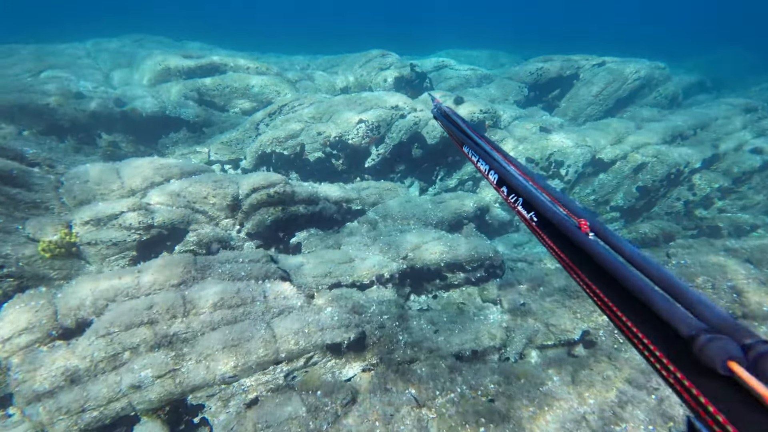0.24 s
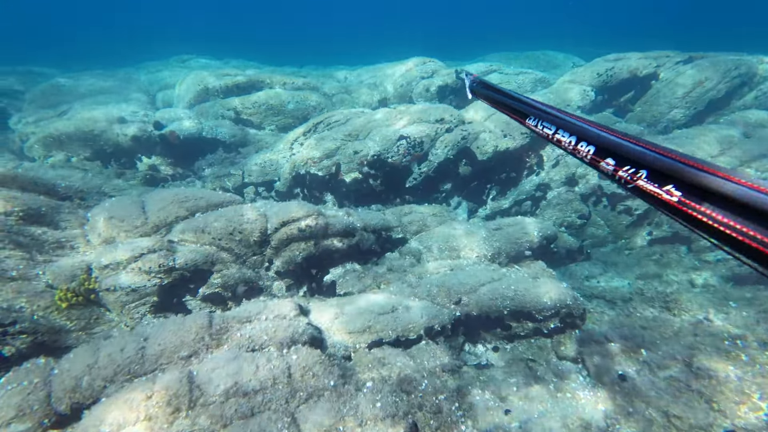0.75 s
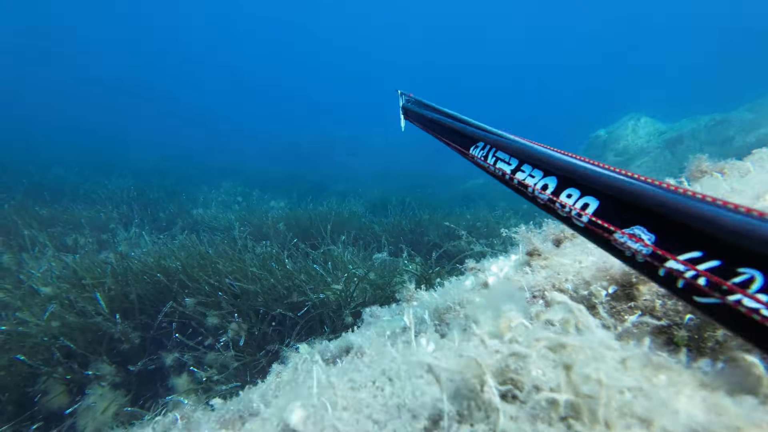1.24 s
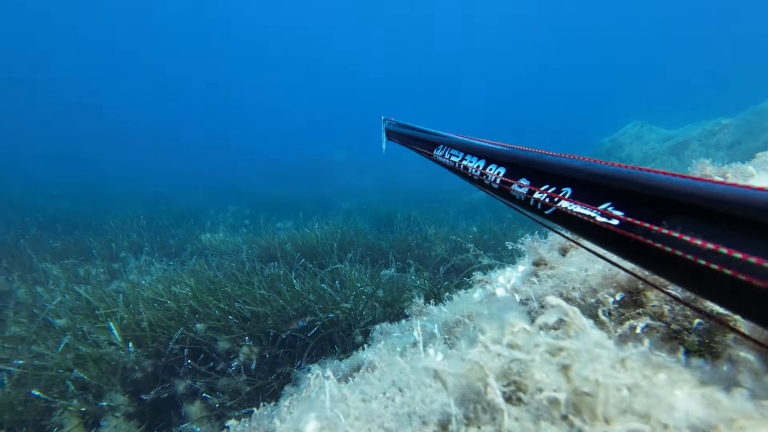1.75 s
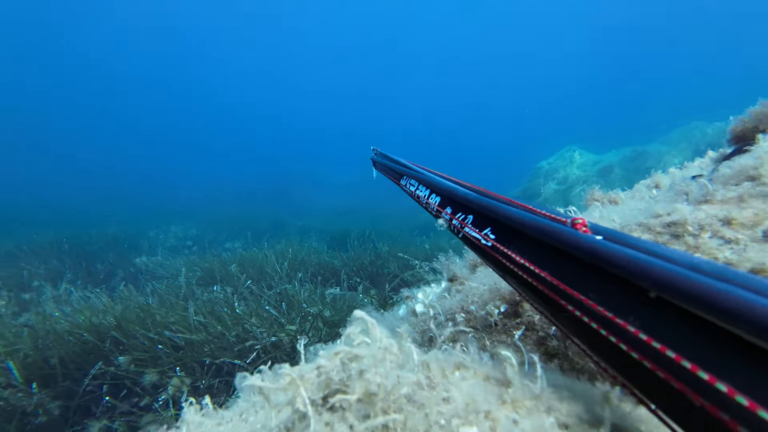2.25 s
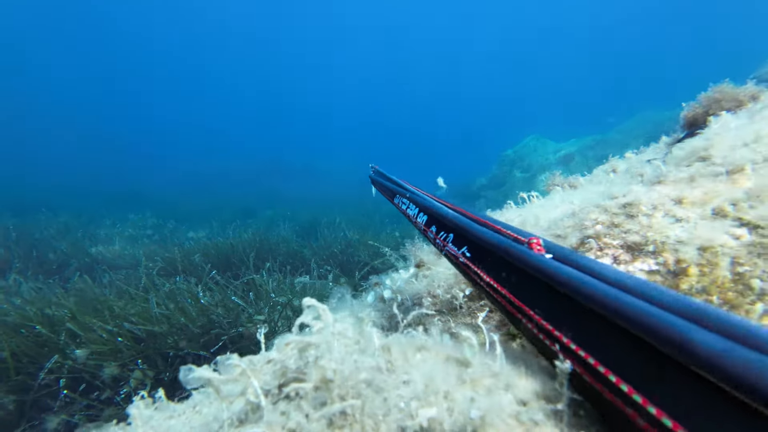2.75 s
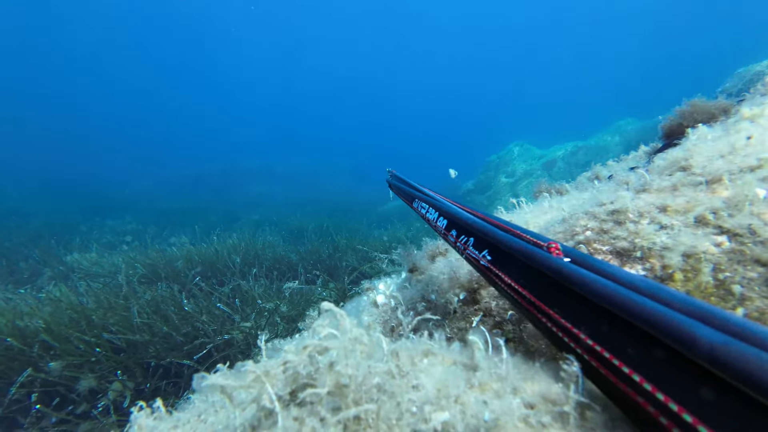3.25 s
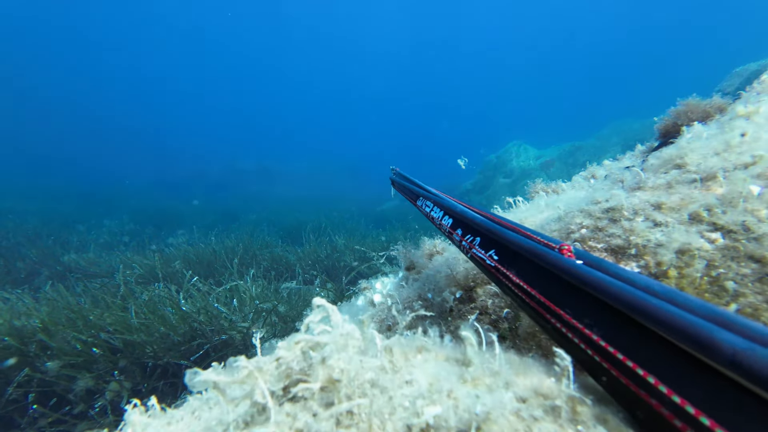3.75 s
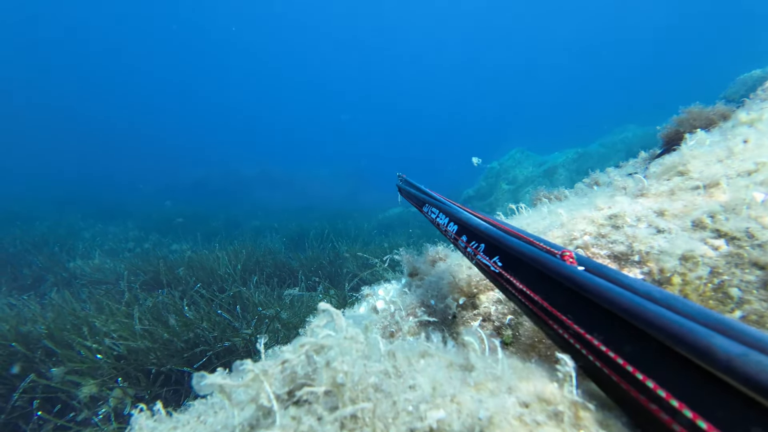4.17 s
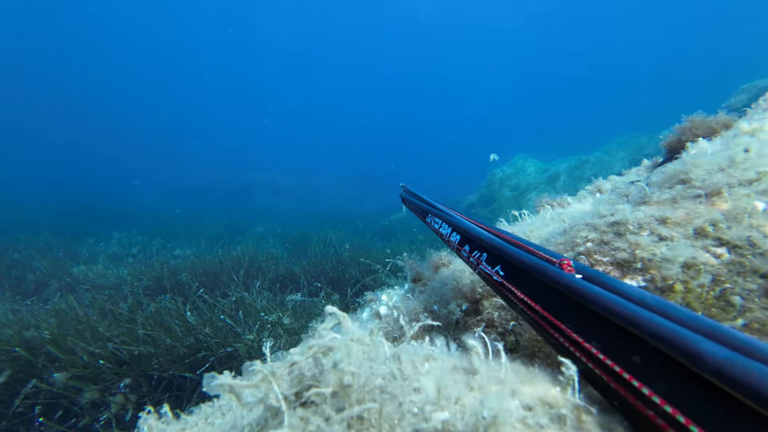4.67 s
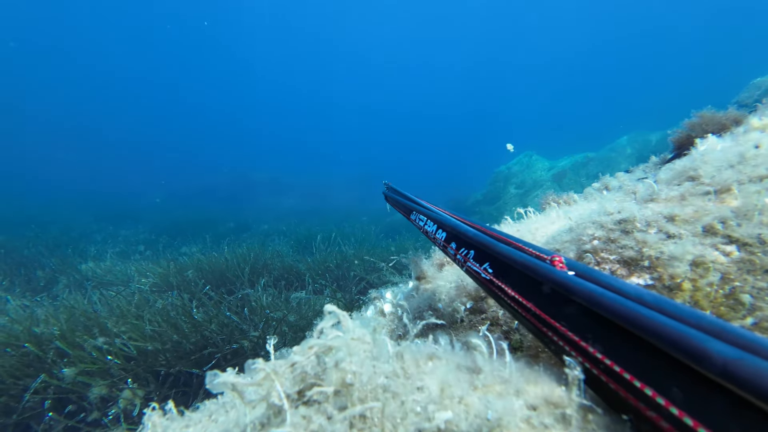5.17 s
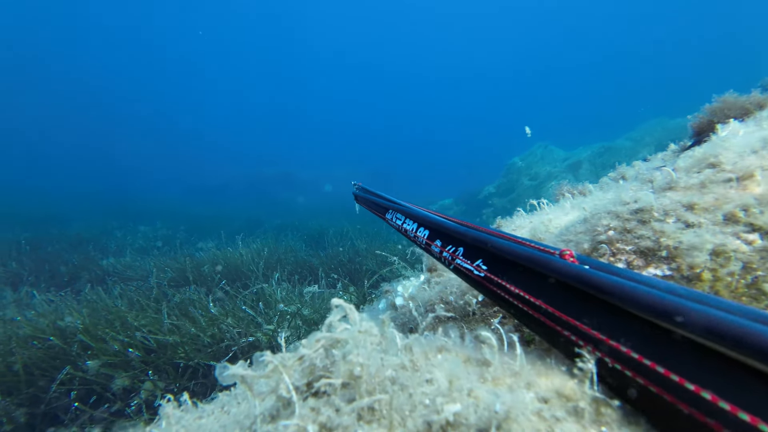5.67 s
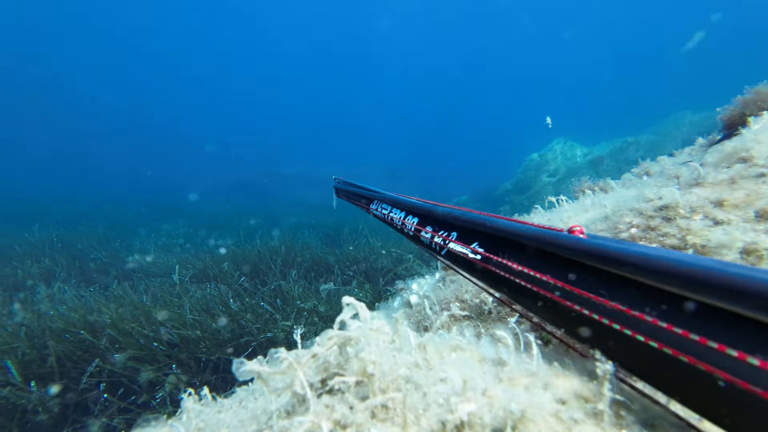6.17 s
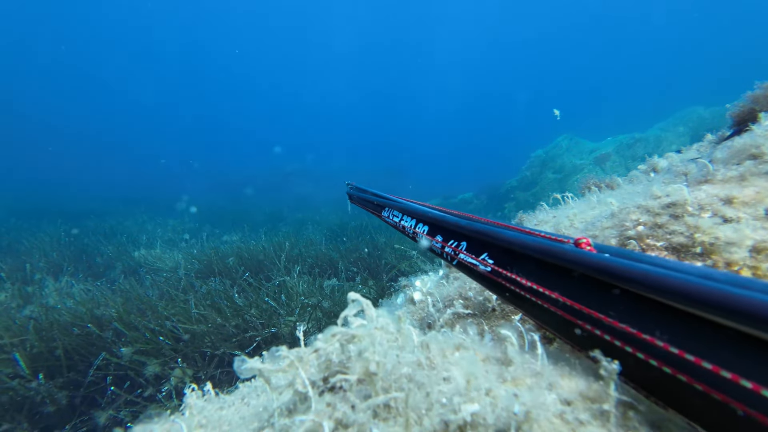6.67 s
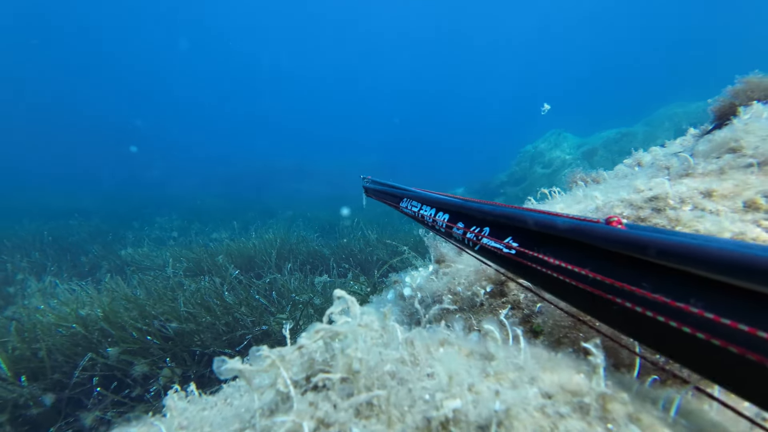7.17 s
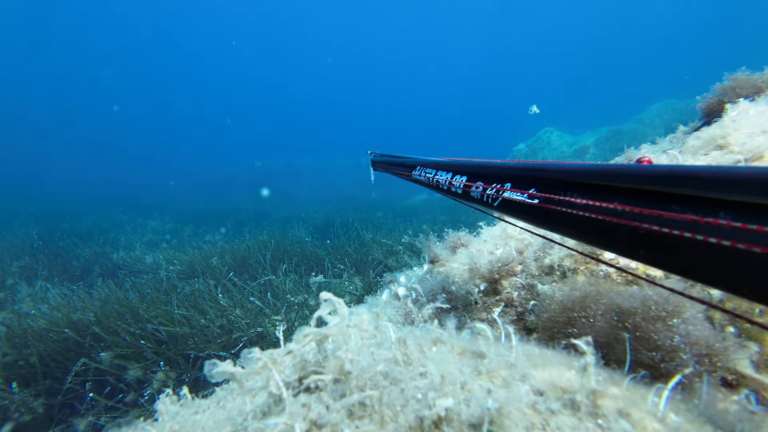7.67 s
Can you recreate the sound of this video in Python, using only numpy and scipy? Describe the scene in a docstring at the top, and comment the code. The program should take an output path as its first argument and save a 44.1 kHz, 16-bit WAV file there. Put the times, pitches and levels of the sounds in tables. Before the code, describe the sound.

Underwater by a rocky seabed, heard close and muffled inside a waterproof camera housing. Snapping shrimp make a continuous dense crackle, with individual sharp snaps ringing very briefly and scattering off rocks, above low water rumble, faint hum and hiss. Clear snaps dot the first half second; soft low bumps fall at the start and 0.8. Around 1.1 to 1.3 come more bumps and an abrupt change: snaps ring higher, rumble weakens, water swishes. A deep, strong thump with a hard knock and scrape lands at 2.4, then a swish and a cluster of bumps and taps at 2.7 to 2.8. Bright snaps stand out near 3.2 and 4.65. Light clacks at 3.7 lead to quick knocks at 4.2 to 4.4. Gear clatters and scrapes again at 5.4 to 5.6, with soft bumps at 6.2 and 7.6, as the crackle slowly ebbs to 8 seconds.

```python
"""Snapping shrimp crackle all around over a low water rumble, as heard from a camera in a waterproof housing.
A diver with a speargun lies on a rocky seabed; each clear snap rings the housing wall and scatters off the rocks.
The diver's gear bumps, scrapes and taps as filtered noise, slow sines and short rings, and water swishes past.
After a moment the place changes: the snaps ring higher, the rumble drops and the crackle slowly ebbs."""
import sys
import numpy as np
from scipy import signal
from scipy.fft import rfft, irfft, next_fast_len
from scipy.io import wavfile
from scipy.ndimage import map_coordinates

SR = 44100
rng = np.random.default_rng(int(sys.argv[2]) if len(sys.argv) > 2 else 0)


def wrap_up_sound(samples):
    """Save the sound to the file named by the first command line argument, as 16-bit audio."""
    columns = np.atleast_2d(samples).T
    # keep every value between -1 and 1, then stretch to whole-number steps
    tamed = np.clip(columns, -1, 1)
    steps = np.round(tamed * 32767).astype(np.int16)
    wavfile.write(sys.argv[1], SR, steps)


N = 348831  # length in samples
MOVE_S = 1.28  # the change of place


def amp(db):
    """Decibels to gain."""
    return 10 ** (np.asarray(db) / 20)


def unit(x):
    """x at rms 1."""
    return x / np.sqrt(np.mean(x ** 2) + 1e-20)


def gains(points, hz):
    """Gain of a (Hz, dB) spectrum, read on a log axis."""
    f, db = np.transpose(points)
    return amp(np.interp(np.log(hz + 1), np.log(f + 1), db))


def wobble(rate):
    """A smooth random curve, rate knots a second."""
    knots = rng.standard_normal(int(N * rate / SR) + 4)
    return map_coordinates(knots, [np.arange(N) * rate / SR])


def filtered(x, response):
    """x times a response of frequency."""
    m = next_fast_len(N + SR // 2)
    spectrum = rfft(x, m) * response(np.fft.rfftfreq(m, 1 / SR))
    return irfft(spectrum, m)[:N]


def noise(spectrum):
    """Coloured noise of rms 1."""
    return unit(filtered(rng.standard_normal(N), lambda hz: gains(spectrum, hz)))


def ring(spectrum, shift=1, size=2048):
    """Causal (minimum-phase) answer, of peak 1, of a body with this spectrum to one sharp push."""
    hz = np.fft.rfftfreq(size, 1 / SR) / shift
    cepstrum = irfft(np.log(gains(spectrum, hz)))
    # folding the cepstrum forward in time makes the answer causal
    cepstrum[1:size // 2] *= 2
    cepstrum[size // 2 + 1:] = 0
    answer = irfft(np.exp(rfft(cepstrum)))
    return answer / np.abs(answer).max()


def through(x, answer):
    """x convolved with an answer, at its own length."""
    return signal.fftconvolve(x, answer)[:len(x)]


def add(track, s, sound):
    """Mix a sound into the track from time s."""
    start = int(np.clip(round(s * SR), 0, N - 1))
    track[start:start + len(sound)] += sound[:N - start]


def pops(rate, spread_db, most_db):
    """Random impulses, rate a second: many small ones, a few large ones."""
    size_db = most_db * np.tanh(spread_db * rng.exponential(size=N) / most_db)
    happens = rng.random(N) < rate / SR
    return happens * amp(size_db) * rng.choice([-1, 1], N)


def by_place(before, after):
    """One value per sample, switching at the change of place."""
    return np.where(np.arange(N) / SR < MOVE_S, before, after)


def swell(s, rise, fall):
    """An envelope of peak 1 at time s that grows and dies away exponentially."""
    u = np.arange(N) / SR - s
    return np.exp(-np.maximum(-u / rise, u / fall))


def seabed(echo_db, paths=1800):
    """The direct path, then a new cluster of weak echoes that come back from the rocks a few milliseconds later."""
    t60, delay = .08, .0045  # seconds
    t = np.arange(SR // 10) / SR
    echoes = (rng.random(len(t)) < paths / SR) * rng.standard_normal(len(t))
    echoes *= amp(-60 * t / t60) * (1 - np.exp(-(t / delay) ** 2))
    return (t == 0) + amp(echo_db) * echoes / (np.linalg.norm(echoes) + 1e-9)


# The housing wall, right around the microphone, answering a snap. Each row: frequency in Hz, relative level in dB.
WALL_SPECTRUM = [(200, -59.5), (900, -26.5), (1800, -24.5), (2600, -16), (3200, -7.5), (3700, 3.5),
                 (4050, -6.5), (4400, -15), (5100, -18), (6300, -37), (8500, -50.5), (10000, -49.5),
                 (12000, -70), (16000, -61)]
WALL_HZ = 3700  # its peak before any shift


def wall_ring(hz):
    """A snap rings the housing wall, whose whole spectrum is shifted to put its peak at hz."""
    return ring(WALL_SPECTRUM, hz / WALL_HZ)


RING_HZ = (3010, 3585)  # central pitch of the distant snaps on the wall, before and after the change of place
RING_SPREAD = .075  # that pitch spreads this far up and down (log ratio) over the directions
COLONY_DB = (-64.5, -63)  # distant shrimp, before and after
COLONY_WAVER_DB = 0.17  # slow, random swells of the crackle
EBB_DB_PER_S = .5  # the crackle slowly ebbs in the second place


def far_shrimp():
    """The colony: single ticks over a dense fizz; the wall's pitch varies with the direction they come from."""
    out = np.zeros(N)
    for bend in np.exp(RING_SPREAD * np.linspace(-1, 1, 5)):
        clicks = pops(rate=13, spread_db=8, most_db=21)
        fizz = pops(rate=140, spread_db=5, most_db=16)
        colony = unit(through(clicks, seabed(echo_db=-6))) + amp(-4) * unit(fizz)
        before, after = [unit(through(colony, wall_ring(bend * hz))) for hz in RING_HZ]
        out += by_place(before, after)
    ebb_db = EBB_DB_PER_S * np.maximum(np.arange(N) / SR - MOVE_S, 0)
    level_db = by_place(*COLONY_DB) - ebb_db + COLONY_WAVER_DB * wobble(4)
    return amp(level_db) * unit(out)


# Prickle of tiny snaps close to the microphone. Each row: frequency in Hz, relative level in dB.
PRICKLE_SPECTRUM = [(2500, -2.5), (4500, 3), (5600, -4.5), (8500, -13), (10000, -14.5), (12000, -25.5),
                    (16000, -13.5)]


def tiny_snaps():
    """Very small, close snaps are too short to ring the wall: they prickle in the treble."""
    clicks = pops(rate=55, spread_db=8, most_db=24)
    scattered = through(clicks, seabed(echo_db=-7))
    return amp(-82) * unit(through(scattered, ring(PRICKLE_SPECTRUM)))


# Deep water rumble at the housing. Each row: frequency in Hz, relative level in dB.
RUMBLE_SPECTRUM = [(15, -3), (30, 1.5), (55, 1), (78, -5.5), (110, -4), (140, -4.5), (200, -16), (300, -17),
                   (600, -35), (1500, -71.5)]
RUMBLE_DB = (-53, -59)  # before and after the change of place
WAKE_DB, SETTLE_S = -25.5, 0.086  # rumble stirred up by a bump, relative to the bump; its decay time constant


def water_rumble():
    """Water rumbles against the housing; each bump stirs up a wake that soon settles."""
    wake = sum(amp(db + WAKE_DB) * swell(s, 1 / hz, SETTLE_S) for s, db, hz, _ in BUMP_EVENTS)
    level = np.hypot(amp(by_place(*RUMBLE_DB)), wake)
    return level * amp(wobble(7.8)) * noise(RUMBLE_SPECTRUM)


# The diver's movements that push water past the housing.
# Each row: time of the peak in seconds, flow level in dB, rise and fall time constants in seconds.
STROKES = [(1.37, -54.5, 0.082, 0.16), (1.988, -62.5, 0.43, 0.17), (2.698, -49, 0.12, 0.0085),
           (2.83, -53.5, 0.015, 0.044), (3.03, -60.5, 0.061, 0.054), (3.75, -64.5, .55, 0.9),
           (4.43, -63, 0.26, 0.14), (5.121, -64, 0.069, .08), (5.54, -56.5, 0.075, 0.12),
           (6.0, -62, 0.087, 0.16), (6.77, -64, 0.34, 0.23)]
DRIFT_DB = -72.5  # flow level between movements


def flow():
    """Flow past the housing in dB: each movement swells and fades over a slow drift."""
    power = sum((amp(db) * swell(s, rise, fall)) ** 2 for s, db, rise, fall in STROKES)
    return 10 * np.log10(amp(DRIFT_DB) ** 2 + power)


# Modes of the housing that holds the microphone.
# Each row: frequency in Hz, height over the plain answer in dB, time to fall by 60 dB in seconds.
HOUSING_MODES = [(357, -8.5, 0.035), (525, -2, 0.032), (814, -11, 0.041), (1278, -5.5, 0.14),
                 (1897, 0.5, 0.13), (2800, -12, 0.026), (3300, -8.5, 0.12)]


def housing(x):
    """Gear contacts and small eddies at the camera also set its lightly damped modes ringing."""
    t = np.arange(SR // 10) / SR
    modes = np.zeros(len(t))
    for hz, db, t60 in HOUSING_MODES:
        scale = 2 * np.log(1000) / (t60 * SR)  # gives the mode its height at resonance
        modes += amp(db - 60 * t / t60) * scale * np.cos(2 * np.pi * hz * t)
    return through(x, (t == 0) + modes)


# Small eddies brushing the housing. Each row: frequency in Hz, relative level in dB.
SWISH_SPECTRUM = [(60, -8), (180, 1), (480, -4.5), (750, -5), (1150, -9), (1600, -15), (3500, -24.5),
                  (5000, -58.5)]


def water_swish(flow_db, small_most_db=-56, large_from_db=-57, large_growth=2.3):
    """Water swishes past in eddies, the large dull ones growing fastest with the flow."""
    eddies = pops(rate=900, spread_db=4, most_db=13)
    small_db = np.minimum(flow_db, small_most_db) + 0.96 * wobble(30)
    small = amp(small_db) * unit(through(eddies, ring(SWISH_SPECTRUM)))
    large_db = large_from_db + large_growth * (flow_db - large_from_db)
    large_spectrum = [(50, -3), (110, 5.5), (230, 2.5), (560, 1.5), (850, -25), (3000, -60.5)]  # (Hz, dB)
    return housing(small) + amp(large_db) * noise(large_spectrum)


# Faint low tones in the camera's sound. Each row: frequency in Hz, rms level in dB.
HUM_TONES = [(47.5, -64.5), (95.5, -64), (144, -71.5)]


def hum():
    """A low, slightly wavering hum: sines whose phases wander."""
    t = np.arange(N) / SR
    return sum(amp(db) * unit(np.sin(2 * np.pi * hz * t + wobble(5))) for hz, db in HUM_TONES)


# Faint hiss of the camera. Each row: frequency in Hz, relative level in dB.
HISS_SPECTRUM = [(100, 21.5), (5800, 11), (8000, 3), (10000, -1.5), (12000, -5)]


def hiss():
    """Steady coloured noise, strongest at the bottom."""
    return amp(-80.5) * noise(HISS_SPECTRUM)


# The closest shrimp, each heard singly at the housing.
# Each row: start in seconds, peak of the direct sound in dB, pitch of the wall's ring in Hz.
NEAR_SNAPS = [(0.0044, -34.5, 3080), (0.1186, -41.5, 3230), (0.178, -27.5, 3070), (0.2664, -39.5, 3020),
              (0.4994, -37.5, 2760), (1.3407, -42.5, 3700), (1.8594, -26, 3810), (2.2563, -31.5, 3600),
              (2.3412, -36.5, 3770), (2.678, -31, 3610), (2.9444, -29, 3570), (3.2196, -29.5, 3700),
              (3.2255, -25, 3670), (4.5148, -38, 3800), (4.6362, -33, 3860), (4.6558, -26, 3650),
              (4.7251, -29, 3710), (5.1167, -34, 3870), (5.4211, -39, 3800), (5.5599, -30, 3740),
              (5.7597, -40, 3640), (6.0271, -35.5, 3900), (6.5074, -39.5, 3470), (6.6025, -38, 3710),
              (6.9605, -47, 4000), (6.9711, -36, 3600), (7.006, -36.5, 3800), (7.3215, -39, 3600),
              (7.4729, -33.5, 3900), (7.7067, -33, 3620)]
ECHO_DB = -8  # echo of a -30 dB snap, relative to its direct sound


def near_shrimp():
    """Each collapsing claw bubble is one impulse that rings the housing wall for a few cycles."""
    out = np.zeros(N)
    for s, db, hz in NEAR_SNAPS:
        # fainter snaps are farther away, so more of them is echo
        echo_db = ECHO_DB - .35 * (db + 30)
        add(out, s, amp(db) * through(seabed(echo_db), wall_ring(hz)))
    return out


# Soft bumps against the housing, at no distance from the microphone.
# Each row: time of the peak in seconds, level in dB, pitch in Hz, upper partial in dB relative to the lower.
BUMP_EVENTS = [(0.042, -28, 110, -32), (0.771, -27.5, 110.5, -18), (1.126, -35.5, 105, -11.5),
               (1.214, -31, 87.4, -9.5), (1.229, -33, 152, -27), (2.374, -17.5, 40.9, -5.5),
               (2.71, -27.5, 148, -12), (2.811, -30, 235, -5), (2.828, -31.5, 89.5, -11),
               (4.795, -46.5, 298, -24), (5.397, -36, 166, -20), (5.510, -29, 123, -11),
               (5.582, -43, 69.4, -9), (6.233, -30.5, 106, -8.5), (7.612, -37.5, 119, -14.5)]
RISE_CYCLES, DECAY_CYCLES = 0.4, 0.93  # swell and decay of a bump, in cycles of its pitch
OVERTONE = 2.273  # pitch ratio of a bump's upper partial


def bumps():
    """Soft pushes swell and die away within a few slow cycles, so the deep ones last longest."""
    out, t = np.zeros(N), np.arange(N) / SR
    for s, db, hz, upper_db in BUMP_EVENTS:
        near = np.abs(t - s) < .15
        cycles = hz * (t[near] - s)
        envelope = np.exp(-np.where(cycles < 0, (cycles / RISE_CYCLES) ** 2, cycles / DECAY_CYCLES))
        low = np.sin(2 * np.pi * (cycles + rng.random()))
        high = np.sin(2 * np.pi * (OVERTONE * cycles + rng.random()))
        out[near] += amp(db) * envelope * (low + amp(upper_db) * high)
    return out


# Dull knock of the whole housing under a hard contact. Each row: frequency in Hz, relative level in dB.
KNOCK_SPECTRUM = [(30, -14.5), (150, -11), (260, -8), (400, 6.5), (650, -9), (900, 0.5), (1400, -10.5),
                  (2200, -13.5), (3500, -6.5), (5000, -94), (8000, -74.5)]


def knock(shift=1):
    """The whole housing answers a contact dully, its pitches multiplied by shift."""
    return ring(KNOCK_SPECTRUM, shift)


# Short bright clack of the housing wall under a hard contact. Each row: frequency in Hz, relative level in dB.
CLACK_SPECTRUM = [(300, -18), (1500, -11), (2400, -4), (3400, 4.5), (3900, 1.5), (4400, -20), (6500, -52),
                  (16000, -82)]


def clack(shift=1):
    """The wall alone answers a contact brightly, its pitches multiplied by shift."""
    return ring(CLACK_SPECTRUM, shift)


def creaks(flow_db, brisk_db=-63, tick_db=-66):
    """The gear gives faint dry ticks while it moves through the water, and hardly any at rest."""
    slips = pops(rate=16, spread_db=5, most_db=12)
    motion_db = 1.7 * np.minimum(flow_db - brisk_db, 0)  # full level from brisk flow upward
    ticks = unit(through(slips, knock() + amp(-1.5) * clack()))
    return amp(motion_db + tick_db) * ticks


# Short scrapes of gear on rock, carried into the housing.
# Each row: time of the peak in seconds, level in dB, half length (standard deviation) in seconds.
SCRAPE_STROKES = [(1.732, -50, 0.0062), (2.38, -33.5, 0.016), (2.443, -46.5, 0.0033), (2.704, -40.5, 0.016),
                  (2.822, -43, 0.0068), (3.771, -46, 0.0046), (5.394, -43, 0.0077), (5.521, -41.5, 0.013),
                  (5.55, -55, 0.045), (5.97, -49.5, 0.014), (6.231, -48, 0.0065), (6.78, -59, 0.018),
                  (7.605, -46, 0.0065), (7.874, -51, 0.0057)]
# Colour of one slip of the gear at the housing. Each row: frequency in Hz, relative level in dB.
GRIT_SPECTRUM = [(40, -2), (200, 7), (450, 1.5), (900, -2), (2100, -16), (3400, -2.5), (3900, -8),
                 (4500, -24.5), (6000, -55), (10000, -87.5)]


def scrapes():
    """Each stroke is a swell of tiny slips that shake the housing."""
    t = np.arange(N) / SR
    pressure = sum(amp(db) * np.exp(-((t - s) / half) ** 2 / 2) for s, db, half in SCRAPE_STROKES)
    slips = pops(rate=2200, spread_db=8, most_db=12)
    return pressure * unit(through(slips, ring(GRIT_SPECTRUM)))


# Hard contacts of gear, carried into the housing.
# Each row: start in seconds, knock level in dB, clack of the wall in dB relative to the knock.
TAP_CONTACTS = [(2.38, -14, -16), (2.7137, -25.5, -1.5), (2.8087, -24, -8), (2.8229, -30, 4),
                (3.6839, -42.5, 3.5), (3.7493, -34.5, -2), (4.2223, -42, 2.5), (4.2424, -36.5, -3),
                (4.273, -40, 2), (4.3339, -28, -2), (4.3534, -21.5, -2.5), (4.3663, -30, -8),
                (5.3832, -23.5, -20), (5.3933, -35, -12), (5.4866, -32, -1.5), (5.4934, -21.5, -5.5),
                (5.526, -27, -17), (5.5513, -30.5, -3.5), (5.5866, -26, -7), (6.0836, -36.5, -10),
                (7.6086, -36.5, 4.5)]


def taps():
    """A contact gives a dull knock of the whole housing and a short clack of its wall."""
    out = np.zeros(N)
    for s, db, wall_db in TAP_CONTACTS:
        # each contact point shifts the two pitches a little
        knock_shift, clack_shift = np.exp(rng.normal(0, [.09, .025]))
        contact = knock(knock_shift) + amp(wall_db) * clack(clack_shift)
        add(out, s, -amp(db) * contact)
    return out


def scene():
    """Shrimp, gear and water at the one microphone."""
    flow_db = flow()
    shrimp = far_shrimp() + tiny_snaps() + near_shrimp()
    water = water_rumble() + water_swish(flow_db)
    gear = bumps() + housing(creaks(flow_db) + scrapes() + taps())
    return (shrimp + water + gear)[None]


def record(dry):
    """The camera adds a faint hum and hiss and keeps nothing above its band limit."""
    top_hz = 15750
    return filtered(dry[0] + hum() + hiss(), lambda hz: hz < top_hz)[None]


dry = scene()
out = record(dry)
wrap_up_sound(out)
```